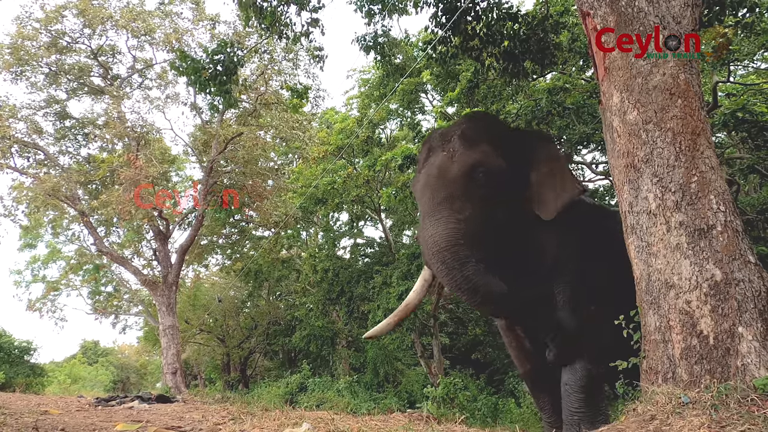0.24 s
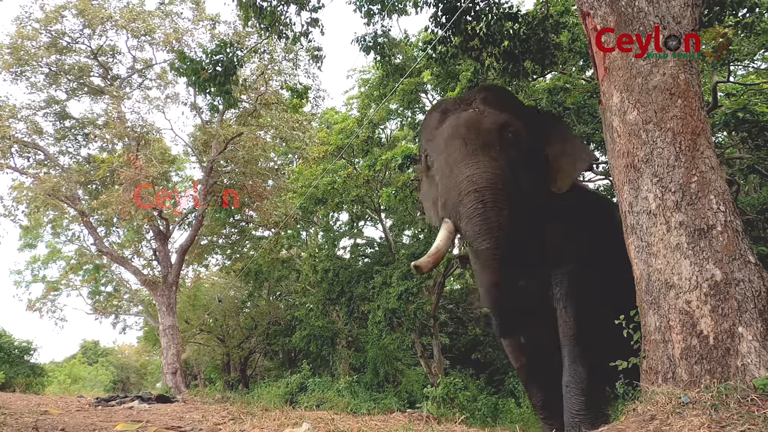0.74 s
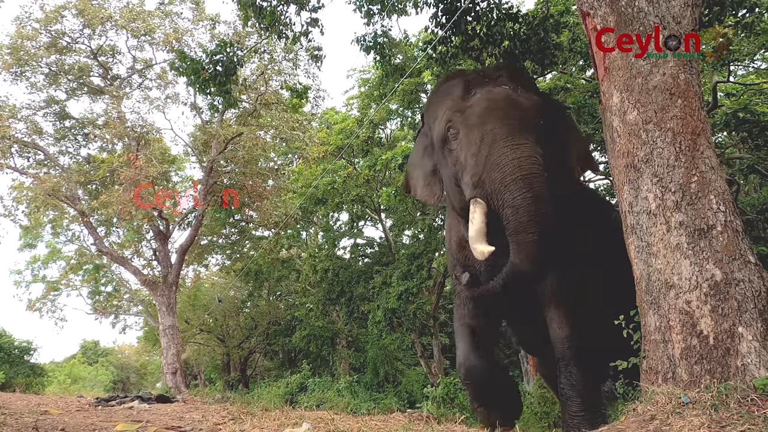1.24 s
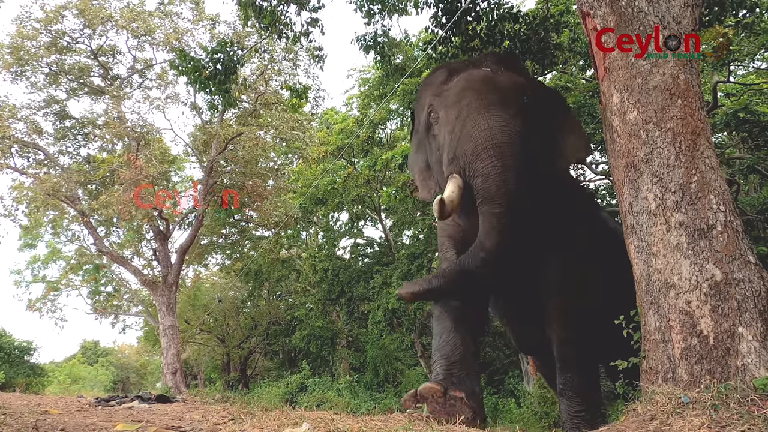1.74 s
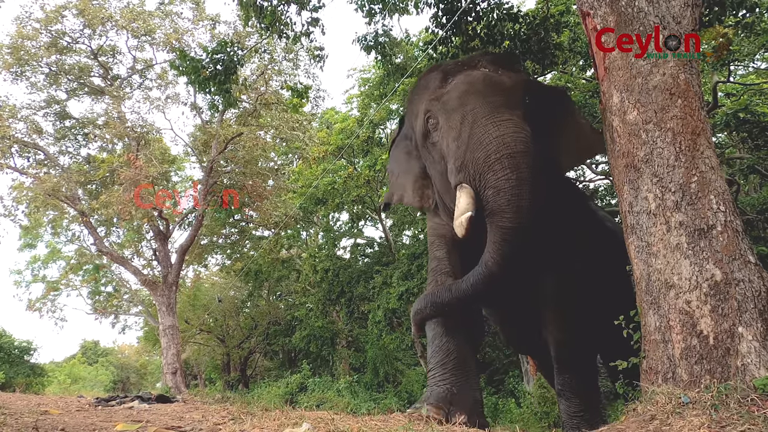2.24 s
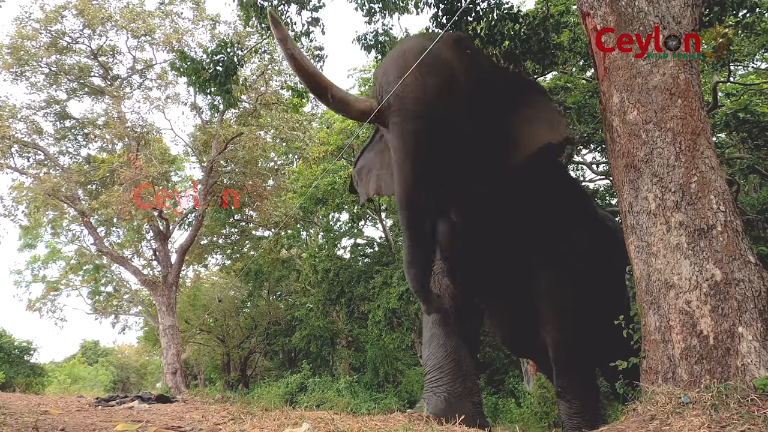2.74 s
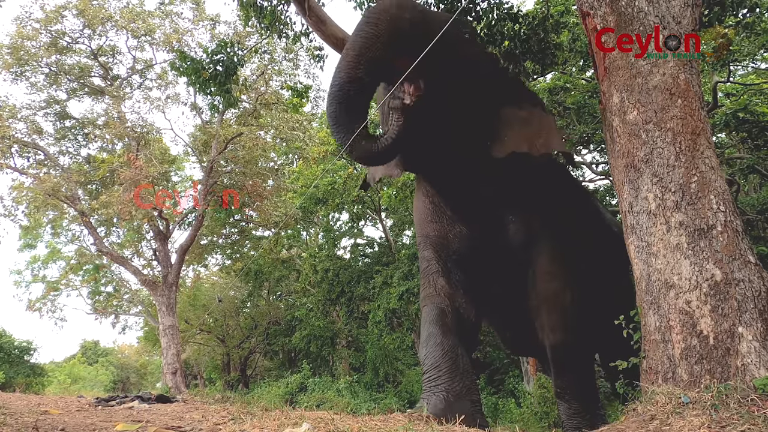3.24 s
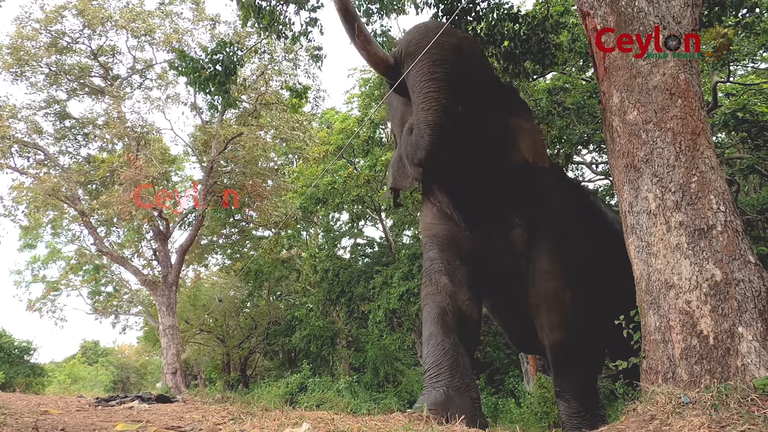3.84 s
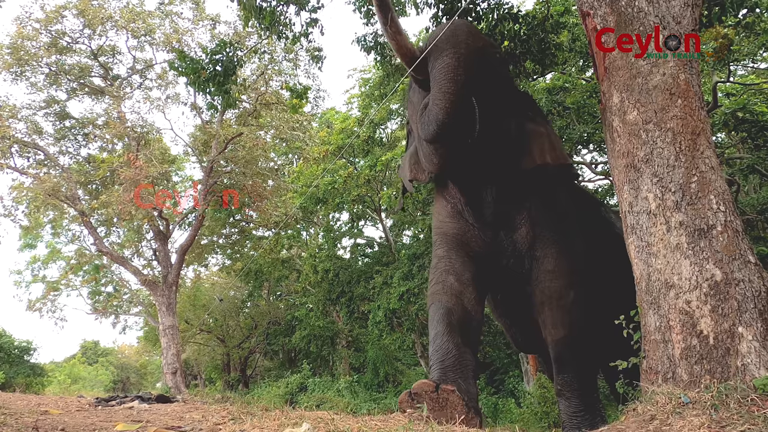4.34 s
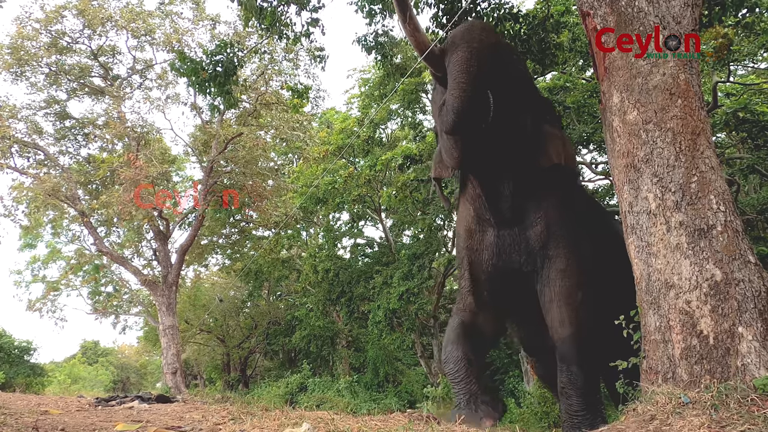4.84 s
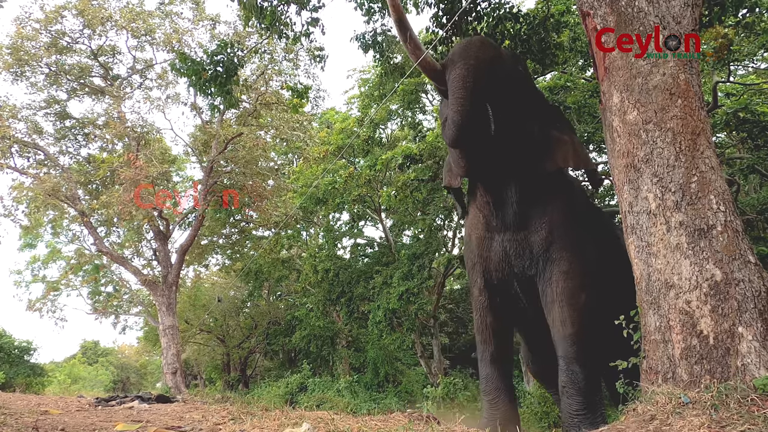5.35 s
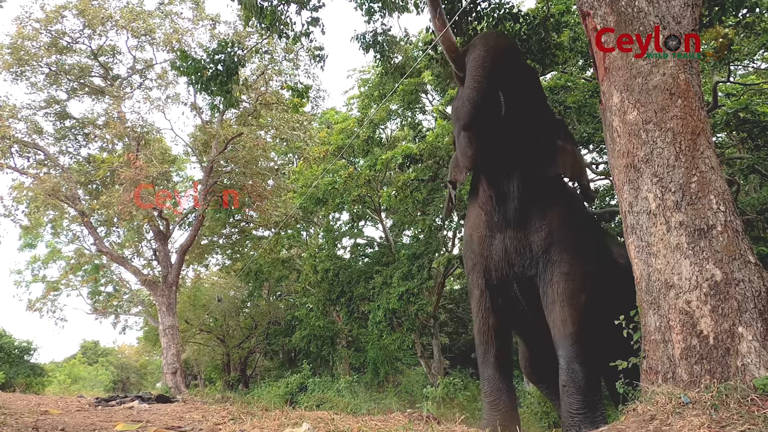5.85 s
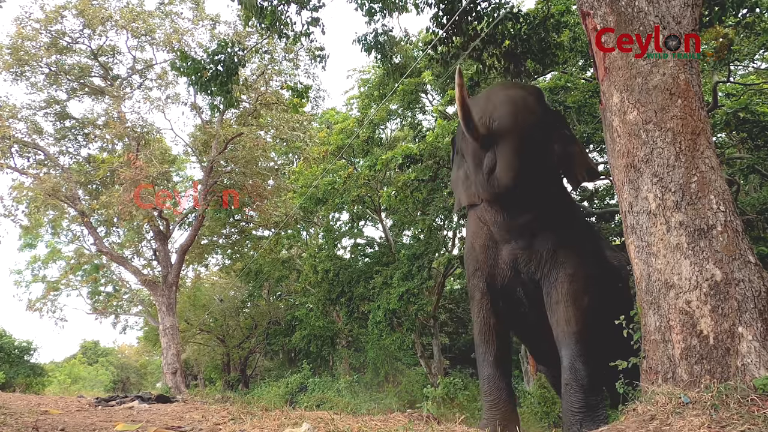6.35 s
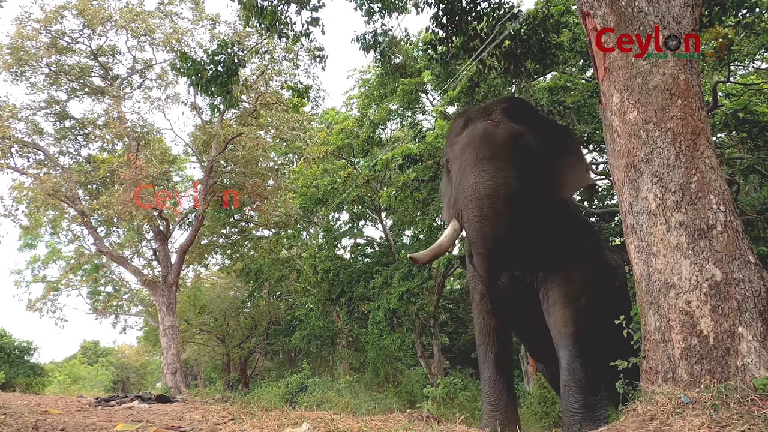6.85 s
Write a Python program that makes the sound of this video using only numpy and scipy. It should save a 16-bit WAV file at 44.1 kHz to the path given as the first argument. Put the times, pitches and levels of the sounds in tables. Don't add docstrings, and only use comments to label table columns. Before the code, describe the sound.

Outdoors at a forest edge, low wind buffets the microphone over hushed air and faint echoing birds. A bird trills quickly, then drops a few clear whistles. A taut fence wire knocks and rattles around three seconds. Grit and twigs crunch under an elephant's foot past the middle, then the wire is struck hard and chatters brightly until the end. One live channel, left only.

```python
import sys
import numpy as np
from scipy import signal
from scipy.fft import rfft, irfft, next_fast_len
from scipy.io import wavfile
from scipy.ndimage import uniform_filter1d, map_coordinates

SR = 44100
rng = np.random.default_rng(int(sys.argv[2]) if len(sys.argv) > 2 else 0)


def ratio(d):
    e = np.asarray(d, float) / 20
    return 10 ** e


def wav_record(signal):
    frames = np.transpose(np.atleast_2d(signal))
    bounded = np.clip(frames, -1, 1)
    quanta = np.round(bounded * 32767).astype(np.int16)
    wavfile.write(sys.argv[1], SR, quanta)


N = 313551

# frequency in Hz, density in dB per Hz.
AIR_COLOUR = [(15, 4.5), (25, -4.5), (46, -2.5), (203, -2), (700, -21.5), (930, -30.5), (1030, -20.5),
              (1870, -25.5), (3950, -29), (9270, -97), (10000, -38), (10800, -78), (12000, -71),
              (15600, -104), (22000, -120)]
# peak in seconds, level in dB, rise and fall over 20 dB in seconds.
GUSTS = [(0.0, -38, .1, 0.28), (0.45, -41.5, 0.87, 0.19), (0.62, -32, 0.18, 0.49),
         (0.88, -31.5, 0.22, 0.065), (1.09, -28, 0.19, 0.19), (1.22, -24.5, 0.16, 0.11),
         (1.53, -36.5, 0.062, 0.39), (1.66, -34, 0.19, 0.23), (1.92, -33.5, 0.086, 0.25),
         (2.12, -35.5, 0.2, 0.095), (2.43, -34, 0.23, 0.4), (2.82, -38, 0.051, 0.24),
         (3.15, -36, 0.1, 0.12), (3.28, -38, 0.11, 0.18), (3.62, -37.5, 0.34, 0.13),
         (3.82, -44.5, 0.22, 0.23), (4.1, -43.5, 0.14, 0.14), (4.32, -49, 0.091, 0.45),
         (4.7, -47, 0.81, 0.11), (4.85, -39.5, 0.076, 0.51), (5.2, -45, 0.033, 0.35),
         (5.64, -47, 0.22, 0.17), (6.04, -23, 0.017, 0.046), (6.5, -57, 0.39, 0.19),
         (6.81, -43.5, 0.1, 0.49), (6.98, -42.5, 0.26, 0.11)]
# frequency in Hz, density in dB per Hz.
LEAF_COLOUR = [(250, 0), (800, -5), (1400, -0.5), (2500, 2), (4200, 4.5), (6500, -5), (9000, -11.5),
               (11000, -18.5), (14500, -65)]
# peak in seconds,
# level in dB, rise in seconds, fall in seconds.
BRUSHES = [(0.44, -61, 0.81, 1.7), (0.85, -60, 0.11, 0.52), (1.74, -46.5, 0.18, 0.22),
           (2.04, -50, 0.18, 0.24), (2.43, -52.5, 0.19, 0.48), (2.85, -44, 0.21, 0.042),
           (2.91, -45.5, 0.15, 0.22), (3.05, -41.5, 0.0094, 0.22), (3.25, -59.5, 1, 5.8),
           (4.7, -55, 1, 0.44), (5.02, -59, 0.34, 0.91), (5.187, -42, 0.022, 0.25),
           (5.6, -56.5, 0.18, 0.26), (5.74, -57, 0.14, 0.14), (5.97, -51.5, 0.23, .2),
           (6.06, -40, 0.1, 0.08), (6.14, -42, 0.16, 0.27), (6.44, -48, 0.87, 0.22), (6.58, -45, 0.42, 0.2),
           (6.83, -37, 0.15, 0.14), (6.93, -43, 0.26, 0.22), (7.08, -50, 0.16, 0.045)]
# start in seconds, length in seconds, first Hz, last Hz, level in dB.
FAR_GLIDES = [(0.345, 0.049, 4340, 5340, -57), (0.388, 0.075, 5420, 3920, -60.5),
              (0.417, 0.15, 2400, 3480, -60.5), (0.772, 0.08, 2420, 3400, -59.5),
              (0.767, 0.091, 3550, 4000, -63), (0.832, 0.041, 4100, 5300, -54),
              (1.3, 0.057, 3700, 3900, -65), (.25, 0.27, 3800, 3770, -73), (2.514, 0.02, 3480, 3630, -54),
              (2.35, 0.024, 3520, 3650, -56.5), (2.665, 0.022, 3500, 3650, -52),
              (2.094, 0.037, 4260, 4300, -63), (3.614, 0.11, 3670, 3020, -58),
              (3.913, 0.068, 3700, 2990, -55.5), (4.042, 0.037, 4450, 5160, -50),
              (4.218, 0.086, 3800, 2910, -54.5), (4.811, 0.12, 3800, 3250, -58.5),
              (5.548, 0.045, 3450, 4200, -53.5), (5.591, 0.049, 4200, 3900, -56),
              (5.699, 0.059, 3410, 4180, -54), (5.845, 0.052, 3450, 4100, -50.5)]
# time in seconds, peak in dB.
CHIP_PAIRS = [(1.5413, -53), (1.566, -48), (1.5968, -43), (1.621, -40), (1.653, -39), (1.691, -36.5),
              (1.729, -37), (1.779, -36), (1.8284, -35), (1.879, -36.5), (1.92, -43), (1.976, -35),
              (2.0277, -33.5)]
# start in seconds, length in seconds, first Hz, last Hz, level in dB.
WHISTLES = [
    (2.142, 0.077, 2602, 2830, -34.5),
    (2.295, 0.068, 2292, 2340, -38.5),
    (2.35, 0.12, 2370, 2390, -51.5),
    (2.475, 0.061, 2151, 2165, -34),
]
# peak in seconds, level in dB, rise in seconds, fall in seconds, centre in Hz.
FOOTFALLS = [(0.15, -55.5, 0.28, 0.27, 440), (0.42, -52, 0.087, 0.26, 500), (0.574, -50.5, 0.15, 0.12, 536),
             (1.75, -62, 0.027, 0.16, 590), (1.936, -33.5, 0.053, 0.039, 1070),
             (2.018, -51, 0.034, 0.061, 600), (2.664, -56, 0.037, 0.059, 373),
             (2.862, -70, 0.062, 0.74, 880), (3.072, -52, 0.066, .05, 1560), (3.124, -56, 0.018, 0.15, 660),
             (3.384, -54.5, 0.079, 0.16, 363), (3.718, -52.5, 0.042, 0.045, 477),
             (4.5, -40.5, 0.19, 0.33, 1310), (4.578, -30.5, 0.068, 0.064, 990),
             (4.615, -32.5, 0.05, .06, 900), (4.683, -30, .05, 0.021, 1090), (4.72, -31, 0.2, 0.083, 565),
             (4.795, -30, 0.0042, 0.014, 800), (4.89, -54, 0.094, 0.032, 334),
             (5.186, -35.5, 0.019, 0.095, 497), (5.228, -36, 0.043, 0.07, 366),
             (5.32, -59.5, 0.042, 0.31, 500), (5.798, -53, 0.066, 0.15, 557),
             (5.975, -74, 0.037, 0.018, 565)]
# time in
# seconds, peak in dB, pitch in Hz.
SNAPS = [(1.934, -45, 1200), (4.424, -43, 1030), (4.457, -38, 1170), (4.52, -29.5, 1040),
         (4.537, -28, 1490), (4.571, -27, 1110), (4.58, -18, 1050), (4.614, -18, 1110), (4.657, -26, 630),
         (4.679, -27, 1290), (4.696, -19, 700), (4.722, -20, 604), (4.712, -21, 710), (4.792, -25, 855),
         (5.181, -47, 586), (5.199, -23, 290), (5.222, -29, 250), (6.033, -28.5, 131.2), (6.181, -33, 410)]
RAPS = [(2.8647, -23, 4960), (2.8691, -21, 4900), (2.8753, -24, 4830), (3.0578, -24, 4990),
        (3.0663, -23, 5120), (3.0769, -24, 5150), (3.0867, -20, 5020), (3.0902, -25, 5000),
        (3.095, -24, 5170), (3.1272, -21, 4960), (3.132, -21, 5000), (3.1552, -25, 5090),
        (5.9978, -11, 4920), (6.0041, -11, 5040), (6.0071, -11, 4970), (6.0131, -15, 4990),
        (6.019, -19, 4990), (6.0274, -21, 5170), (6.0394, -19, 5080), (6.0474, -15, 5090),
        (6.0518, -15, 4880), (6.055, -12, 5040), (6.0694, -14, 5030), (6.114, -20, 5100),
        (6.1203, -19, 5170), (6.1234, -19, 5100), (6.1416, -18, 4980), (6.1521, -18, 5240),
        (6.1731, -20, 5140), (6.1801, -20, 5080), (6.2146, -14, 5150), (6.225, -19, 5030),
        (6.2314, -19, 5170), (6.2494, -17, 5210), (6.3691, -18, 5180), (6.3747, -18, 5230),
        (6.3974, -16, 5180), (6.4064, -16, 5270), (6.4228, -18, 5250), (6.4312, -21, 5270),
        (6.4577, -22, 5250), (6.5463, -19, 5260), (6.5524, -22, 5280), (6.5571, -20, 5180),
        (6.5813, -22, 5250), (6.6028, -22, 5130), (6.6448, -20, 5080), (6.6913, -23, 5190),
        (6.7666, -22, 5050), (6.7702, -21, 5140), (6.7733, -19, 5130), (6.7883, -21, 5220),
        (6.7936, -20, 5330), (6.8348, -22, 5140), (6.8394, -23, 5490), (6.843, -23, 5270),
        (6.9271, -18, 5100), (6.9328, -22, 5310), (6.9378, -23, 5180), (7.0117, -24, 5120)]
# start in seconds, peak in dB, pitch in Hz, time to silence in seconds.
LINGERING_MODES = [(2.864, -29.5, 6030, 0.07), (2.865, -34.5, 8000, 0.053), (2.865, -47, 7260, 0.18),
                   (2.865, -29, 4580, 0.056), (2.863, -37.5, 5170, 0.21), (2.865, -45, 7660, 0.19),
                   (3.049, -55, 6270, .25), (3.126, -29, 5033, 0.12), (3.126, -27.5, 6530, 0.046),
                   (3.17, -46, 5120, 0.14), (3.126, -41.5, 7570, 0.18), (3.124, -60, 7540, 0.18),
                   (3.052, -29.5, 4300, 0.025), (3.069, -38, 5500, .12), (3.07, -31.5, 4850, 0.13),
                   (3.151, -52, 5550, 0.17), (3.27, -45.5, 5080, 0.22), (6.052, -17.5, 3450, 0.011),
                   (6.069, -39, 7520, 0.13), (6.091, -39, 6450, 0.081), (6.03, -29, 6000, 0.051),
                   (6.16, -30, 5180, 0.062), (6.369, -35, 7280, 0.061), (6.579, -30, 5900, 0.067),
                   (6.771, -30, 5980, 0.086), (6.97, -30, 5220, 0.16), (6.97, -28.5, 7500, 0.038),
                   (7.09, -40, 8360, 0.082), (6.166, -28, 3570, 0.013), (6.458, -38.5, 3900, 0.022),
                   (6.599, -28, 3900, 0.014), (6.825, -28, 3960, .015), (6.937, -28, 3580, 0.013),
                   (6.15, -26, 5830, 0.041), (6.288, -34, 8500, 0.07), (6.288, -34, 7530, .05),
                   (6.289, -32, 5800, 0.053), (6.555, -32, 8530, 0.068), (6.68, -34, 6500, 0.071),
                   (6.767, -36.5, 7740, 0.18), (6.82, -28, 6500, 0.082), (6.925, -27, 6420, 0.038),
                   (7.085, -48, 6450, 0.18)]
# frequency in Hz, level in dB, 60 dB decay in seconds.
WIRE_MODES = [(2050, -25, 0.013), (3400, -67, 0.056), (3700, -59, .03), (4630, -18.5, 0.065),
              (4600, -32, 0.034), (4850, -11, 0.12), (5000, -12, 0.065), (5086, -1.5, 0.049),
              (5180, -13.5, 0.047), (5290, -6, 0.074), (5710, -7.5, 0.049), (5450, -14, 0.1),
              (5730, -19, 0.049), (5900, -8, 0.035), (6285, -9.5, 0.062), (6190, -14, 0.11),
              (6740, -13.5, 0.057), (7270, -19, 0.1), (7420, -25.5, 0.29), (7350, -1.5, 0.0092),
              (7870, -15, 0.069), (8600, -16, 0.14), (9040, -16.5, 0.18), (9570, -13, 0.063),
              (10000, -27, 0.03), (9600, -3, 0.0078), (10200, -2, 0.0098), (11160, -14, 0.029)]
# time in seconds, peak in dB, sharpness in dB.
KNOCKS = [(2.862, -7.5, -16), (3.0531, -16.5, -24), (3.086, -12, -31), (3.1264, -9.5, -33), (3.349, -27, 1),
          (3.9032, -69, -12.5), (5.9905, -1, -6), (5.9922, -3.5, -14), (6.0533, -30, -7), (6.0676, -14, -9),
          (6.1378, -8.5, -14), (6.168, -22, -4), (6.2135, -19, -25), (6.248, -12, -18), (6.2896, -10.5, -9),
          (6.361, -7.5, -15), (6.398, -17, -19), (6.455, -13, -4), (6.5435, -16, -28), (6.601, -31, -17),
          (6.6434, -13, 0), (6.6743, -21, -12), (6.7699, -13, -27), (6.9257, -10, -22), (6.9622, -13.5, 7),
          (7.0852, -13, -28)]
# peak in seconds, level in dB, rise in seconds, fall in seconds,
# brightness in dB per octave.
TUGS = [(2.84, -43, 0.075, .008, 0), (2.861, -26.5, 0.0018, 0.058, 7), (2.98, -40.5, .1, 0.06, -8),
        (3.06, -26, 0.028, 0.15, -0.5), (3.09, -25.5, 0.025, 0.017, -9.5), (3.13, -27, 0.009, 0.08, -3.5),
        (3.33, -46.5, 0.74, 3.5, 17), (3.91, -46, 0.036, 0.087, 5), (4.0, -80, 0.89, 21, 9),
        (4.73, -48, 0.12, 0.028, 0), (5.62, -52, 0.081, 2.9, 0), (5.922, -46, 0.0079, 0.43, 7),
        (5.995, -21, 0.0027, 0.05, -8), (6.05, -24, 0.059, 0.66, -2), (6.22, -25, 0.17, 0.067, -11),
        (6.41, -23.5, 0.29, 0.12, -4), (6.545, -22.5, 0.057, 0.11, -1.5), (6.63, -22.5, 0.1, 0.027, -7.5),
        (6.69, -22.5, 0.032, 0.14, -1.5), (6.772, -20.5, 0.078, 0.066, 4.5), (6.83, -24, 0.082, 0.17, 7.5),
        (6.928, -18.5, 0.022, 0.02, 10), (6.98, -26, 0.1, 0.2, 20), (7.1, -19.5, 0.088, 0.052, -1.5)]
# frequency in Hz, gain in dB.
CONTACT_COLOUR = [(500, -32), (1500, -9), (3000, -1.5), (6000, -5), (9000, -11), (12000, -12), (15000, -16)]
# frequency in Hz, gain in dB.
WIRE_RADIATION = [(600, -9), (1500, -2), (4000, -3), (9000, -2), (10200, -6), (12500, -1), (13500, -4),
                  (15000, -11)]
# frequency in Hz, absolute floor in dB per bin,
# floor in dB relative to the loudest treble band.
FAINT_LIMITS = [(250, -125, -60), (520, -115, -37), (800, -115, -29.5), (1050, -115, -31),
                (1310, -125, -79), (7000, -115, -60), (8000, -108, -47), (10090, -104, -25.5),
                (10980, -71, -35.5), (11760, -79, -61), (13000, -81, -34), (14700, -78, -28),
                (15200, -60, 0)]

AIR_DB = -54.5
LULL_DB, EDDY_HZ, EDDY_HZ_PER_DB = -86, 59.3, 1.3
LEAF_REST_DB = -70
CHURR_S, CHURR_END_S, CHURR_DB, CHURR_PER_S = 1.53, 1.72, -53.5, 100
CHURR_HZ, CHURR_SWING_HZ, CHURR_TOP_HZ, CHURR_TOP_DB = 3260, 432, 3900, -6
CHIP_TOP_HZ, CHIP_END_HZ = 4000, 2680
PAIR_SHARE = 0.25
WHISTLE_SWELL_DB, WHISTLE_PEAK = -16, 0.92
RAP_T60_S, RAP_DB, RAP_PAIR_RATIO, RAP_RISE_S = 0.02, -1.0, 1.045, 0.0022
RING_CHOKE = 1.9
SHARP_REF_HZ = 5100


def evened(x):
    return x / np.sqrt(np.mean(x ** 2) + 1e-20)


def noise():
    return rng.standard_normal(N)


def add(mix, s, sound):
    part = mix[round(s * SR):][:len(sound)]
    part += sound[:len(part)]


def colour(x, points):
    hz, db = np.transpose(points)
    size = next_fast_len(N)
    bins_hz = np.fft.rfftfreq(size, 1 / SR)
    gain = ratio(np.interp(np.log(bins_hz + 1), np.log(hz), db))
    return irfft(rfft(x, size) * gain, size)[:N]


def resonate(x, hz, width_hz):
    turn = np.exp(2j * np.pi * np.cumsum(hz * np.ones(len(x))) / SR)
    r = np.exp(-np.pi * width_hz / SR)
    return 2 * (turn * signal.lfilter([1 - r], [1, -r], x / turn + 1e-18)).real


def drift(size):
    return evened(uniform_filter1d(uniform_filter1d(noise(), size), size))


def grains(per_s, spread_db):
    size = ratio(spread_db * np.minimum(rng.exponential(1, N), 4)) * rng.choice([-1., 1.], N)
    return evened(size * (rng.random(N) < per_s / SR))


def jittered(end, step):
    grid = np.arange(0, end, step)
    return grid + rng.integers(0, step, len(grid))


def ring(x, hz, t60_s):
    r, w = np.exp(-np.log(1000) / (t60_s * SR)), 2 * np.pi * hz / SR
    return signal.lfilter([np.sin(w)], [1, -2 * r * np.cos(w), r * r], x)


def tone(hz, gain):
    return np.sqrt(2) * gain * np.sin(2 * np.pi * np.cumsum(hz) / SR)


def swells(rows, rest_db, bend):
    s, db, rise_s, fall_s, *rest = np.transpose(rows)[:, :, None]
    t = np.arange(0, N + 32, 32) / SR
    away = abs(t - s) / np.where(t < s, rise_s, fall_s)
    power = ratio(2 * np.maximum(db - 20 * away ** bend, -150))
    total = power.sum(0)
    curves = [np.sqrt(total + ratio(2 * rest_db))]
    curves += [(power * column).sum(0) / total for column in rest]
    return [np.interp(np.arange(N) / SR, t, curve) for curve in curves]


def woods(x, t60_s, start_s):
    at = jittered(SR // 2, 24)
    taps = np.zeros(SR)
    taps[at + round(start_s * SR)] = rng.choice([-1., 1.], len(at)) * ratio(-60 * at / SR / t60_s)
    return signal.fftconvolve(x, taps / np.linalg.norm(taps))[:N]


def air():
    return ratio(AIR_DB + 1.4 * drift(size=6000)) * evened(colour(noise(), AIR_COLOUR))


def wind():
    gain, = swells(GUSTS, LULL_DB, bend=0.97)
    hz = EDDY_HZ + EDDY_HZ_PER_DB * (20 * np.log10(gain) + 45)
    eddies = resonate(resonate(noise(), hz, 26.7), hz, 25.6)
    push = colour(noise(), [(8, -23), (25, 2.0), (60, 0.0), (150, -63.0), (400, -56.0), (1200, -91)])
    buffets = evened(evened(eddies) + 0.81 * evened(push))
    return gain * ratio(0.66 * drift(size=1500)) * buffets


def rustle():
    gain, = swells(BRUSHES, LEAF_REST_DB, bend=0.8)
    leaves = evened(colour(noise() + 0.14 * grains(2000, 6.3), LEAF_COLOUR))
    return ratio(0.5) * gain * ratio(1.66 * drift(size=500)) * leaves


def far_birds():
    out = np.zeros(N)
    for s, length_s, first_hz, last_hz, db in FAR_GLIDES:
        path = np.sin(np.linspace(0, np.pi / 2, round(length_s * SR)))
        hz = first_hz + (last_hz - first_hz) * path
        add(out, s, tone(hz, ratio(db) * signal.windows.tukey(len(hz), 0.25)))
    return 0.28 * out * ratio(3 * drift(size=200)) + ratio(-3.5) * woods(out, 0.35, 0.004)


def churr():
    out, t = np.zeros(N), np.arange(0, CHURR_END_S - CHURR_S, 1 / SR)
    swing = np.sin(2 * np.pi * CHURR_PER_S * t + 1.6 * drift(size=500)[:len(t)])
    shape = np.sin(np.pi * (t / t[-1]) ** 1.1) ** 0.49
    gain = ratio(CHURR_DB) * shape * (1.06 + 0.13 * swing)
    low = tone(CHURR_HZ - CHURR_SWING_HZ * swing, gain)
    high = tone(CHURR_TOP_HZ + 300 * swing, gain * ratio(CHURR_TOP_DB))
    add(out, CHURR_S, low + high)
    return out + ratio(-7) * woods(out, 0.15, 0.003)


def trill():
    out, u = np.zeros(N), np.linspace(0, 1, 600)
    hz = CHIP_END_HZ + (CHIP_TOP_HZ - CHIP_END_HZ) * (1 - u) ** 1.28
    shape = np.sin(np.pi * u ** 1.37) ** 2
    lead, chip = tone(hz[::2], shape[::2]), tone(hz, shape)
    beats_s = np.gradient(np.transpose(CHIP_PAIRS)[0])
    for (s, db), beat_s in zip(CHIP_PAIRS, beats_s):
        add(out, s - 0.005, ratio(db - 7.5) * lead)
        add(out, s - 0.0065 + PAIR_SHARE * beat_s, ratio(db - 4.5) * chip)
    return out + ratio(-0.5) * woods(out, 0.1, 0.003)


def whistles():
    out = np.zeros(N)
    for s, length_s, first_hz, last_hz, db in WHISTLES:
        u = np.linspace(0, 1, round(length_s * SR))
        swell = ratio(db + WHISTLE_SWELL_DB * abs(u / WHISTLE_PEAK - 1))
        gain = swell * signal.windows.tukey(len(u), 0.55)
        add(out, s, tone(first_hz + (last_hz - first_hz) * u ** 2.83, gain))
    return out + ratio(-6) * woods(out, 0.3, 0.0052) + ratio(-12.0) * woods(out, 0.67, 0.033)


def steps():
    grit = (0.7 * noise() + 0.7 * grains(2000, 2.5)) * ratio(1.4 * drift(size=350))
    gain, centre_hz = swells(FOOTFALLS, -97, bend=1.25)
    out = gain * evened(resonate(resonate(grit, centre_hz, 1270.0), centre_hz, 3300.0))
    t = np.arange(800) / SR
    for s, db, hz in SNAPS:
        crumbs = uniform_filter1d(rng.standard_normal(800), size=6)
        body = np.sin(2 * np.pi * hz * t) + 0.5 * crumbs
        add(out, s, ratio(db + 3.0 - 60 * t / 0.011) * body)
    return colour(out, [(60, -1.5), (200, -0.5), (1700, -5.5), (3500, -17.5), (9000, -34), (12000, -60)])


def raps():
    out, t = np.zeros(N), np.arange(SR // 3) / SR
    rap_rise = np.minimum(t / RAP_RISE_S, 1) ** 2
    rap_fall_db = -60 * np.maximum(t - RAP_RISE_S, 0) / RAP_T60_S
    for s, db, hz in RAPS:
        pair = np.sin(2 * np.pi * hz * t) + 0.063 * np.sin(2 * np.pi * hz * RAP_PAIR_RATIO * t)
        add(out, s - RAP_RISE_S, ratio(db + RAP_DB + rap_fall_db) * rap_rise * pair)
    for s, db, hz, silence_s in LINGERING_MODES:
        gain = ratio(db - 60 * (t / silence_s) ** RING_CHOKE) * np.minimum(t / 0.0046, 1)
        add(out, s, gain * np.sin(2 * np.pi * hz * t))
    out *= ratio(1.2 * drift(size=150))
    return out + ratio(-17) * woods(out, 0.04, 0.004)


def wire():
    shake, bright_db = swells(TUGS, -71, bend=0.81)
    slots = jittered(N - 40, 40)
    live = ratio(1.2 * np.minimum(rng.exponential(1, len(slots)), 4)) * (rng.random(len(slots)) < 0.9)
    bright_db = np.minimum(bright_db[slots], 6)
    chance = rng.standard_normal((len(slots), len(WIRE_MODES)))
    place_db = 3.0 * evened(uniform_filter1d(rng.standard_normal(chance.shape), size=45, axis=0))

    s, knock_db, sharp_db = np.transpose(KNOCKS)
    at = np.round(s * SR).astype(int)
    luck = ratio(2.0 * rng.standard_normal((len(s), len(WIRE_MODES))))
    bounces = rng.standard_normal(400) * ratio(-60 * np.arange(400) / SR / 0.0051)
    bounces /= np.linalg.norm(bounces)

    chatter, rings = np.zeros((2, N))
    for k, (hz, db, t60_s) in enumerate(WIRE_MODES):
        small, hard = np.zeros((2, N))
        octaves = np.log2(hz / SHARP_REF_HZ)
        small[slots] = live * chance[:, k] * ratio(place_db[:, k] + bright_db * octaves)
        hard[at] = ratio(knock_db + 0.69 * sharp_db * max(octaves, 0)) * luck[:, k]
        rubbed_s = 0.65 * t60_s * min(1, (5300 / hz) ** 2.5)
        chatter += ratio(db) * ring(small, hz, rubbed_s)
        rings += ratio(db - 16.0) * ring(signal.oaconvolve(hard, bounces)[:N], hz, t60_s)
    chatter_rms = np.sqrt(uniform_filter1d(chatter ** 2, size=800) + 1e-9)
    rings += ratio(-2.0) * shake * chatter / chatter_rms
    slack = np.cumsum(0.007 * drift(size=2000))
    slack -= uniform_filter1d(slack, size=9000)
    rings = map_coordinates(rings, [np.arange(N) + slack], order=3)

    ticks = np.zeros(N)
    ticks[at] = ratio(knock_db + np.minimum(sharp_db, 0) + 6.0)
    ticks[slots] += ratio(3.5 + bright_db) * live * chance[:, 0] * shake[slots]
    contacts = signal.oaconvolve(colour(ticks, CONTACT_COLOUR), bounces)[:N]
    near = colour(rings + contacts, WIRE_RADIATION)
    return near + ratio(-6.5) * woods(near, 0.1, 0.004)


def scene():
    background = air() + wind() + rustle() + far_birds()
    bird = churr() + trill() + whistles()
    mix = background + bird + steps() + raps() + wire()
    return np.array([2 * mix, 0 * mix])


def drop_faint_bands(x):
    hz, _, z = signal.stft(x, SR, nperseg=1024)
    power = uniform_filter1d(uniform_filter1d(abs(z) ** 2, size=5, axis=1), size=4, axis=2) + 1e-30
    limit_hz, floor_db, under_db = np.transpose(FAINT_LIMITS)
    loudest = power[:, hz > 3500].max(axis=1, keepdims=True)
    floor = ratio(2 * np.interp(hz, limit_hz, floor_db))[:, None]
    under = ratio(2 * np.interp(hz, limit_hz, under_db))[:, None]
    whim = uniform_filter1d(rng.standard_normal(power.shape[1:]), size=4, axis=0)
    whim = uniform_filter1d(whim, size=6, axis=1)
    whim_db = np.where(hz < 1500, 42, 14)[:, None] * whim
    limit = (floor + loudest * under) * ratio(whim_db)
    return signal.istft(z / (1 + (limit / power) ** 6), SR, nperseg=1024)[1][:, :N]


def band_limit(x):
    return signal.sosfilt(signal.butter(12, 14960, fs=SR, output="sos"), x)


def record(dry):
    limited = 1.3 * np.tanh(dry / 1.3)
    return band_limit(drop_faint_bands(limited))


dry = scene()
out = record(dry)
wav_record(out)
```